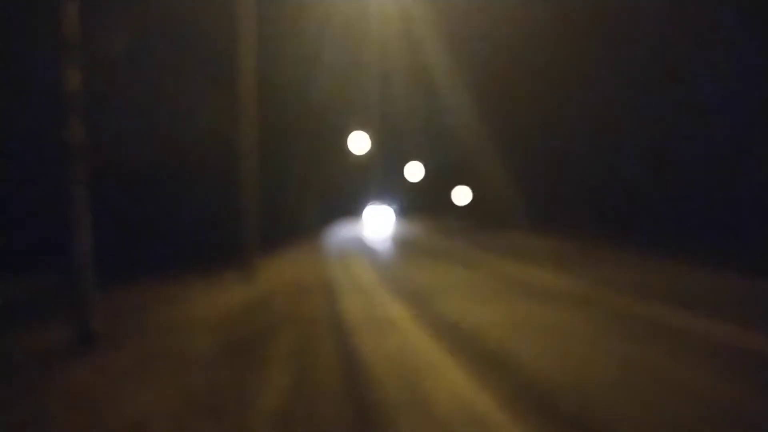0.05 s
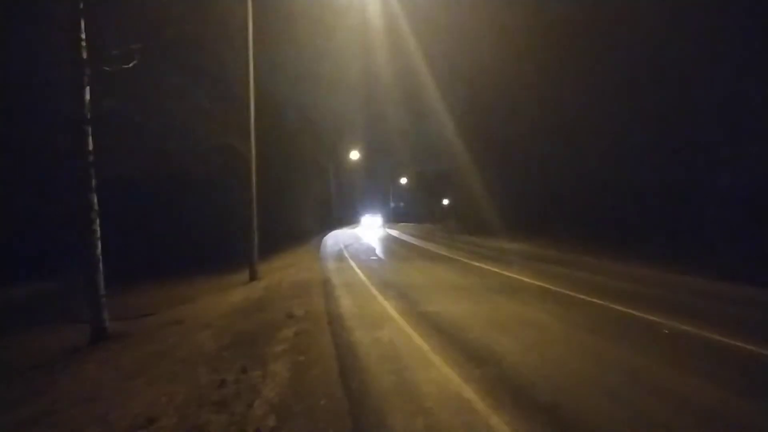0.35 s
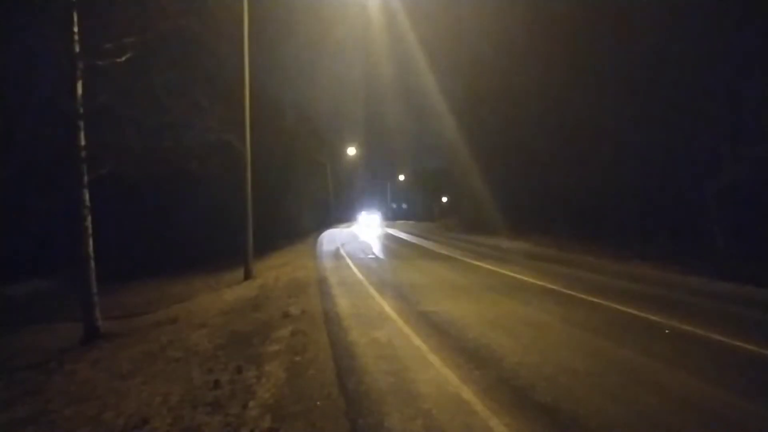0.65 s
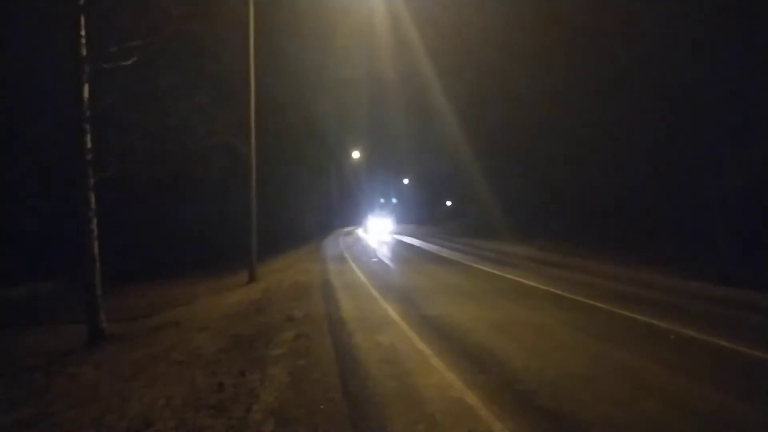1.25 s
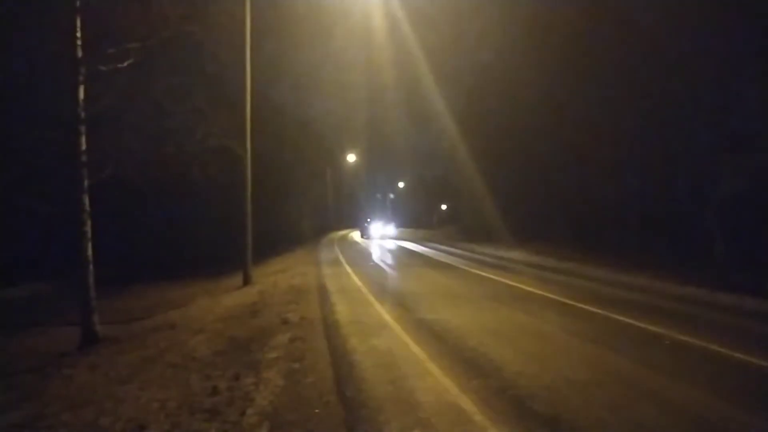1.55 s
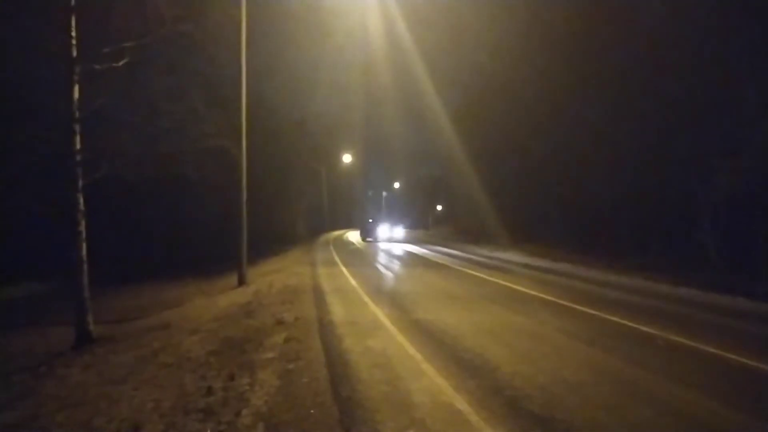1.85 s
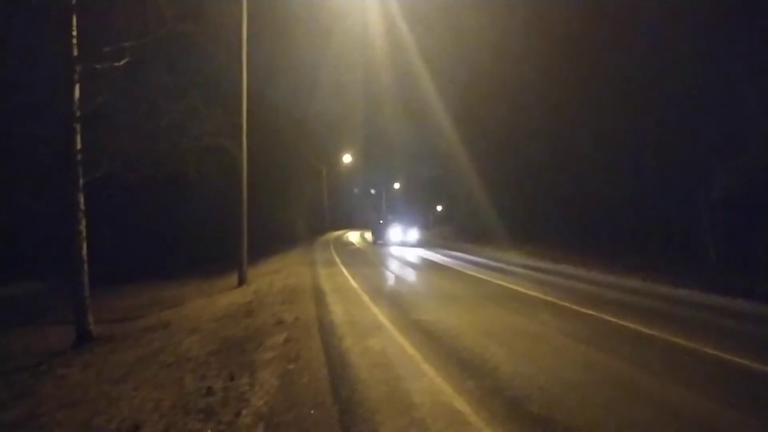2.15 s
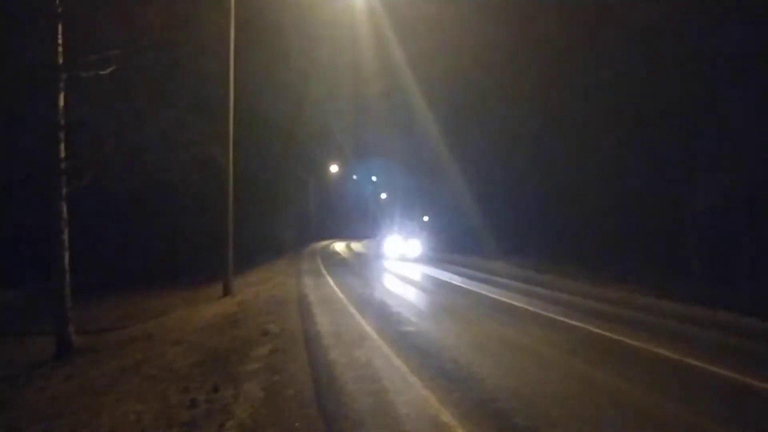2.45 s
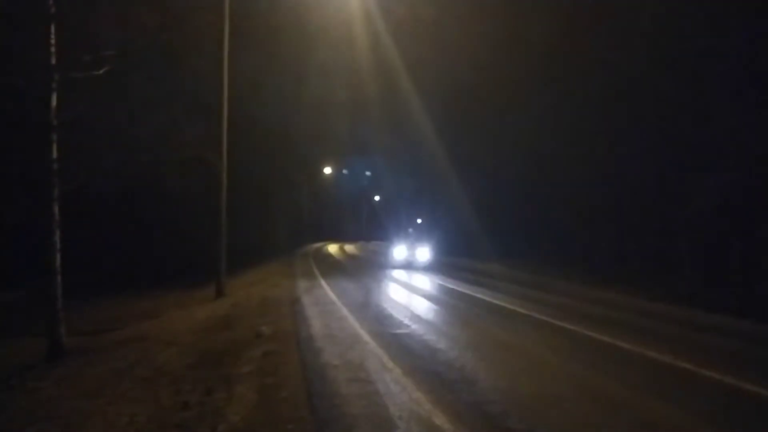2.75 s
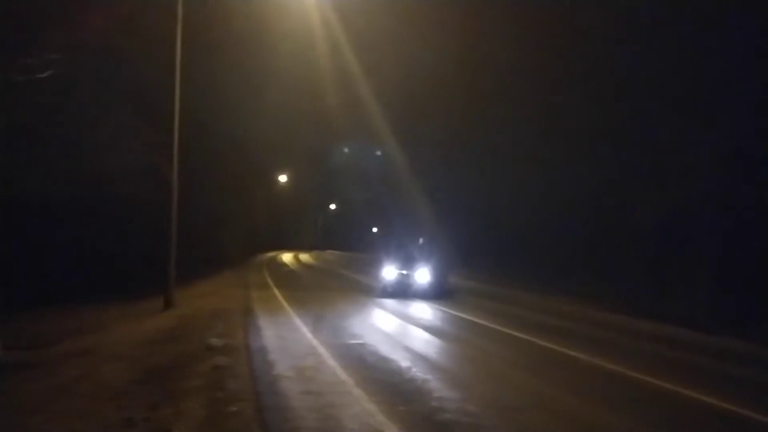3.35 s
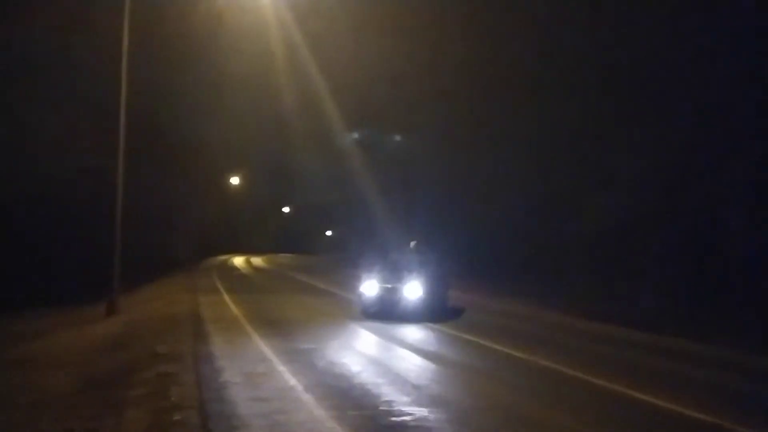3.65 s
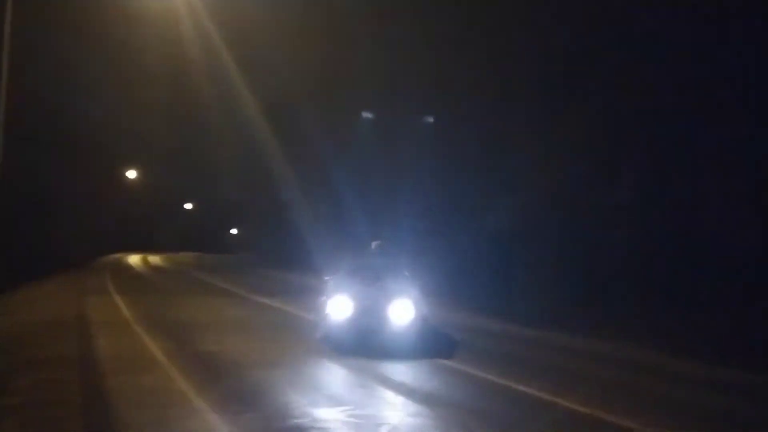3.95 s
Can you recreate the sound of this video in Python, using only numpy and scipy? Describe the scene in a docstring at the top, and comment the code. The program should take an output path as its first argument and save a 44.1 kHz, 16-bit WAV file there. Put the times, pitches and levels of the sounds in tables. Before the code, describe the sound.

Heard from the roadside among trees, a vehicle's tyres roar on wet pavement, distant at first and then steadily closer. The engine drones underneath while watery hiss builds, ending with a quick run of slaps and small splashes.

```python
"""The tyres of a heavy vehicle roar near 1 kHz as it approaches on a damp, tree-lined road at night.
The roar brightens and its resonances rise as the vehicle nears; the tread sings, and slaps and
splashes over bumps. Water flung off the tread hisses above it, and the engine's firing drones below.
Two closely spaced roadside microphones receive the direct sound, scatter from the trees and a
treble reflection from a nearby surface."""
import sys
import numpy as np
from scipy import signal
from scipy.fft import rfft, irfft
from scipy.io import wavfile
from scipy.ndimage import uniform_filter1d, map_coordinates

SR = 44100
rng = np.random.default_rng(int(sys.argv[2]) if len(sys.argv) > 2 else 0)


def dump_mix(stems):
    """Bounce the given channels to the path in sys.argv[1] as a 16-bit WAV at rate SR."""
    frames = np.atleast_2d(stems).T  # one column per channel
    limited = np.clip(frames, -1, 1)  # hard clip at full scale
    pcm = np.round(limited * 32767).astype(np.int16)
    wavfile.write(sys.argv[1], SR, pcm)


N = 176400

# Tyre roar arriving at the roadside: time_s, gain_db
ROAR_GAIN = [(0, -38), (.5, -37.5), (.85, -37), (1.11, -33.5), (1.27, -34.5), (1.45, -36.5), (1.62, -37),
             (1.88, -34), (2.3, -33.5), (2.6, -32.5), (2.85, -32), (3.15, -29.5), (3.35, -27.5),
             (3.53, -28), (3.59, -26.5), (3.75, -26.3), (3.86, -26), (4, -27.5)]
# Openness of the path to the tyres: time_s, nearness (0 far and screened, 1 close)
PATH_NEARNESS = [(0, 0.068), (.75, 0.11), (1.05, 0.43), (1.25, 0.74), (1.42, 0.28), (1.65, 0.27),
                 (2.0, 0.46), (2.5, 0.84), (3.0, 0.95), (3.3, 0.87), (3.6, 1), (4, 0.78)]
# Tyre spectrum far away: frequency_hz, gain_db
FAR_SPECTRUM = [(150, -30), (380, -18.5), (500, -2.5), (590, -8.5), (700, -2), (800, -6), (930, 1.5),
                (1030, -0.5), (1170, 3), (1450, -11.5), (1700, -2), (1930, -12.5), (2100, -7.5),
                (2450, -18.5), (2950, -20), (3350, -22.5), (3600, -26), (4400, -34.5), (6000, -40.5),
                (9000, -47), (11000, -82)]
# Tyre spectrum close by: frequency_hz, gain_db
NEAR_SPECTRUM = [(150, -25), (380, -14), (480, -11.5), (570, -10.5), (740, -8), (930, 0), (1080, -2.5),
                 (1280, -1.5), (1500, -4), (1770, -0.5), (1980, -8), (2210, -6), (2500, -17), (2760, -5.5),
                 (2980, -10.5), (3200, -20.5), (3420, -15.5), (3700, -30), (3950, -23), (5000, -36),
                 (6500, -34.5), (9000, -33.5), (11000, -78)]
# Shift of the tyre resonances: time_s, frequency_ratio
RESONANCE_SHIFT = [(0, 0.991), (2.6, 0.985), (3.1, 1.004), (3.501, 1.014), (3.75, 1.033), (4, 1.048)]
# Narrow band sung by the tread: time_s, level_db, centre_hz
TREAD_BAND = [(.95, -50, 1179), (1.22, -39.5, 1292), (1.5, -50.5, 1142), (1.9, -41.5, 1070),
              (2.3, -45, 1081), (2.8, -53, 1120), (3.3, -35.5, 1162), (3.6, -26.5, 1240), (3.82, -29, 1342),
              (4, -30.5, 1380)]
# Hollow tyre rumble, strongest at middle distance: time_s, level_db
RUMBLE_LEVEL = [(0, -63), (1.1, -61.5), (2.1, -49), (3.1, -54)]
# Its spectrum: frequency_hz, gain_db
RUMBLE_SPECTRUM = [(200, -25), (330, 5.5), (385, -8), (470, 0), (570, 8.5), (680, -1), (790, 11.5),
                   (1200, -28)]

# Tyres striking bumps: start_s, impact_db, splash_db
BUMPS = [(1.424, -21, -70), (3.419, -14, -52), (3.5822, -7.5, -28), (3.612, -10.5, -46), (3.622, -12, -48),
         (3.724, -15, -35), (3.821, -11, -44), (3.843, -11, -31)]
# Modes of the struck tread: frequency_hz, gain_db, t60_s
TREAD_MODES = [(1000, -3, .004), (1400, -2, .003)]
# Spectrum of a splash: frequency_hz, gain_db
SPLASH_SPECTRUM = [(1500, -19), (3000, -13), (5000, -5), (7000, -11), (8900, 7), (9800, -5), (12000, -48)]
# Spray off the tread: time_s, gain_db
SPRAY_GAIN = [(0, -72), (.7, -71), (1.05, -63), (1.27, -66), (1.42, -68), (1.65, -64), (2.12, -56.5),
              (2.45, -59), (2.8, -57.5), (3.0, -52.5), (3.45, -48.5), (3.66, -44), (3.74, -44),
              (3.88, -43.5), (4, -40.5)]
# Its spectrum: frequency_hz, gain_db
SPRAY_SPECTRUM = [(4000, -14.5), (6000, -7.5), (7200, -2.5), (8000, 4.5), (9000, 5.5), (9600, -12.5),
                  (10400, -40), (11500, -44), (14000, -39)]
# Wet rasp of the tread: time_s, level_db
RASP_LEVEL = [(0, -71), (.8, -65.5), (1.07, -56.5), (1.17, -58.5), (1.25, -53), (1.36, -59), (1.6, -64),
              (2.0, -59), (2.9, -54.5), (3.4, -52.5), (3.75, -46.5), (4, -49)]
# Its spectrum: frequency_hz, gain_db
RASP_SPECTRUM = [(1500, -20), (2500, -4), (2850, 5.5), (3250, -11), (3480, 2), (3750, 2), (4020, 2),
                 (4400, -0.5), (4750, -1), (5500, -6.5), (8000, -5), (10500, -50)]
# Hiss of the finest mist: time_s, level_db
MIST_LEVEL = [(2.2, -92), (2.899, -63), (3.3, -59), (3.6, -51.5), (4, -45.5)]
# Its spectrum: frequency_hz, gain_db
MIST_SPECTRUM = [(6000, -32), (8500, 6), (9600, 6.5), (10600, -9.5), (12000, -18), (14000, -15)]

# Engine drone: time_s, level_db
DRONE_LEVEL = [(0, -51), (1.0, -50.5), (2.1, -47.5), (2.9, -43.5), (3.45, -41), (4, -36)]
# Its spectrum: frequency_hz, gain_db
DRONE_SPECTRUM = [(40, -31), (75, -9), (110, -7.5), (140, -8), (170, -4.5), (212, -3.5), (240, 1), (290, 0),
                  (330, 0.5), (385, -7), (460, -1), (560, -4.5), (680, -1), (1200, -67)]
# Deep engine boom: time_s, level_db
BOOM_LEVEL = [(0, -67), (.7, -71), (1.35, -68), (1.45, -59.5), (1.698, -62.5), (2.548, -58.5), (2.9, -54),
              (3.251, -56), (3.7, -50.5), (4, -49)]
# Its spectrum: frequency_hz, gain_db
BOOM_SPECTRUM = [(12, -30), (25, -12), (43, -1.5), (52, -7), (62, -5.5), (78, -16), (140, -23), (300, -73)]
# Wavering hum within the drone: time_s, pitch_hz, level_db
ENGINE_HUM = [(.55, 178, -74), (.75, 172.5, -56), (1.25, 160, -53), (1.45, 170.1, -73), (1.8, 180, -61),
              (2.7, 184.5, -59), (3.4, 180.2, -58), (3.7, 173.6, -46), (4, 168, -47)]
# The engine's lowest note: time_s, pitch_hz, level_db
LOW_NOTE = [(1.3, 45, -80), (1.5, 44.9, -70), (2.5, 45, -66), (2.85, 45.06, -61.5), (4, 44.3, -50)]

# Lag of the reflection from a nearby surface: time_s, delay_ms
REFLECTION_DELAY = [(2.7, 2.045), (3.2, 2.02), (3.6, 1.96), (4, 1.88)]
# Direction of the vehicle: time_s, left_over_right_db, right_delay_ms
DIRECTION = [(0, 0.6, 0), (2.4, 0.5, 0.007), (3.2, 0.3, 0.041), (3.7, 0, 0.026), (4, 0.5, 0.014)]
# Level difference between the microphones: frequency_hz, left_over_right_db
PAIR_BALANCE = [(100, 4), (300, 4), (550, 2.5), (1000, 2), (1350, 0.5), (1520, -5.5), (1780, 1.5),
                (2000, -0.5), (2350, 2), (2620, 9), (3100, 4), (3800, -0.5), (5200, -1.5), (6600, 5.5),
                (9000, -2), (13000, -0.5)]
# Likeness of their signals: frequency_hz, coherence (0 to 1)
PAIR_COHERENCE = [(100, .993), (600, .975), (1000, .93), (1300, .9), (1500, .66), (1780, .8), (2000, .55),
                  (2250, .72), (2520, .45), (2850, .86), (3600, .62), (6500, .35), (8000, .6), (9200, .88)]
# Their phase difference: frequency_hz, left_lead_rad
PAIR_PHASE = [(100, 0.25), (600, -0.25), (1100, -0.62), (1400, -1.14), (1620, -0.51), (1900, -1.44),
              (2150, 1), (2600, -0.87), (4500, -1.43), (7000, -1.62)]


def tyre_roar(trim_db=1.38, flicker_db=.5):
    """Source and filter: tread noise passes through resonances that brighten and rise on approach."""
    hz, frame_s, noise = signal.stft(at_microphones(rng.standard_normal(N)), SR, nperseg=1024)
    near = np.interp(frame_s, *np.transpose(PATH_NEARNESS))
    unshifted_hz = hz[:, None] / np.interp(frame_s, *np.transpose(RESONANCE_SHIFT))
    colour_db = (1 - near) * at_hz(FAR_SPECTRUM, unshifted_hz) + near * at_hz(NEAR_SPECTRUM, unshifted_hz)
    flicker = uniform_filter1d(rng.standard_normal(noise.shape), size=6, axis=0)  # across frequency
    flicker = rms_one(uniform_filter1d(flicker, size=5, axis=1))  # across time
    _, roar = signal.istft(noise * from_db(colour_db + flicker_db * flicker), SR)
    return rms_one(roar[:, :N]) * from_db(in_time(ROAR_GAIN)[0] + trim_db)


def tread_song():
    """Random modulation: tread blocks drum at an unsteady rate, spreading their tone into a band."""
    level_db, centre_hz = in_time(TREAD_BAND)
    song = band_pass(narrow_band(centre_hz, spread_hz=180), low_hz=800, high_hz=1700)
    return at_microphones(rms_one(song)) * from_db(level_db)


def slaps():
    """Impulse response: each bump rings the damped modes of the tread."""
    start_s, impact_db, _ = np.transpose(BUMPS)
    impacts = np.zeros(N)
    impacts[(start_s * SR).astype(int)] = from_db(impact_db)
    ringing = np.zeros(N)
    for hz, gain_db, t60_s in TREAD_MODES:
        radius, angle = from_db(-60 / (t60_s * SR)), 2 * np.pi * hz / SR
        feedback = [1, -2 * radius * np.cos(angle), radius ** 2]
        ringing += from_db(gain_db) * signal.lfilter([0, np.sin(angle)], feedback, impacts + 1e-18)
    return band_pass(ringing, low_hz=610, high_hz=1950)  # the slap keeps no deep thud and little treble


def splashes(trim_db=-3.5, rise_s=.0031, decay_s=.0068):
    """Exponential growth and decay: each bump throws a puff of spray that peaks at the impact."""
    t = np.arange(N) / SR
    envelope = np.zeros(N)
    for peak_s, _, splash_db in BUMPS:
        time_constants = np.maximum((peak_s - t) / rise_s, (t - peak_s) / decay_s)
        envelope += from_db(splash_db + trim_db) * np.exp(-np.minimum(time_constants, 20))
    return envelope * coloured(at_microphones(rng.standard_normal(N)), SPLASH_SPECTRUM)


def spray(trim_db=-1, drops_per_s=7900, spread_db=13, drops_db=-7.5):
    """Shot noise: drops of random size leave the tread at random moments, within a smooth hiss."""
    sizes = from_db(spread_db * np.minimum(rng.exponential(1, N), 5)) * rng.choice([-1, 1], N)
    drops = from_db(drops_db) * rms_one(sizes * (rng.random(N) < drops_per_s / SR))
    hiss = coloured(at_microphones(rng.standard_normal(N) + drops), SPRAY_SPECTRUM)
    flicker_db = .25 * drift(39)
    return hiss * from_db(in_time(SPRAY_GAIN)[0] + trim_db + flicker_db)


def mist(flicker_db=2.5):
    """Amplitude modulation: the hiss of the finest mist flickers, and carries only a short way."""
    return shaped_noise(MIST_SPECTRUM, MIST_LEVEL) * from_db(flicker_db * drift(25))


def engine(firing_hz=60.05, wander=.02, jitter_db=11.5, firing_db=-8):
    """Quasi-periodic excitation: uneven firing pulses sound with a hum, a low note, drone and boom."""
    cycles = np.cumsum(firing_hz * (1 + wander * drift(1.5))) / SR
    pulses = np.diff(np.floor(cycles), prepend=0) * from_db(jitter_db * rng.uniform(-.44, 1, N))
    firing = coloured(at_microphones(pulses), DRONE_SPECTRUM)
    firing *= from_db(in_time(DRONE_LEVEL)[0] + firing_db)
    hum_hz, hum_db = in_time(ENGINE_HUM)
    hum = at_microphones(narrow_band(hum_hz, spread_hz=18)) * from_db(hum_db)
    note_hz, note_db = in_time(LOW_NOTE)
    note_phase = 2 * np.pi * np.cumsum(note_hz) / SR
    note = at_microphones(rms_one(np.sin(note_phase))) * from_db(note_db)
    drone = shaped_noise(DRONE_SPECTRUM, DRONE_LEVEL)
    boom = shaped_noise(BOOM_SPECTRUM, BOOM_LEVEL)
    return firing + hum + note + drone + boom


def with_reflection(pair, strength=.42, above_hz=4000):
    """Comb filtering: an inverted reflection ripples the treble; the ripple rises as the lag shortens."""
    delay_ms, = in_time(REFLECTION_DELAY)
    treble = signal.sosfiltfilt(signal.butter(4, above_hz, "high", fs=SR, output="sos"), pair)
    return pair - strength * np.array([delayed(side, delay_ms) for side in treble])


def at_microphones(x):
    """Partial coherence: direct sound and tree scatter reach a pair differing in level and phase."""
    hz, sides = np.fft.rfftfreq(N, 1 / SR), np.array([[1], [-1]])
    coherence = at_hz(PAIR_COHERENCE, hz)
    direct = rfft(x)
    scatter = direct * np.exp(2j * np.pi * rng.random(len(hz)))
    pair = np.sqrt((1 + coherence) / 2) * direct + sides * np.sqrt((1 - coherence) / 2) * scatter
    balance = from_db(sides * at_hz(PAIR_BALANCE, hz) / 2)
    balance /= np.sqrt(np.mean(balance ** 2, axis=0))  # constant total power
    phase_shift = np.exp(.5j * sides * at_hz(PAIR_PHASE, hz))
    return irfft(pair * balance * phase_shift, N)


def shaped_noise(spectrum, level):
    """Filtered stereo noise of constant spectrum, following a level curve."""
    return coloured(at_microphones(rng.standard_normal(N)), spectrum) * from_db(in_time(level)[0])


def narrow_band(centre_hz, spread_hz):
    """Quadrature modulation: two random amplitudes spread a tone about its moving centre."""
    phase = 2 * np.pi * np.cumsum(centre_hz) / SR
    return drift(spread_hz) * np.cos(phase) + drift(spread_hz) * np.sin(phase)


def drift(corner_hz):
    """Slow random fluctuation: noise through a two-pole low-pass, with rms near 1."""
    hop, settling = 40, 2000  # samples per step, steps
    pole = np.exp(-2 * np.pi * corner_hz * hop / SR)
    noise = rng.standard_normal(N // hop + settling + 2)
    slow = signal.lfilter([1], [1, -2 * pole, pole ** 2], noise)[settling:]
    return np.interp(np.arange(N) / hop, np.arange(len(slow)), rms_one(slow))


def coloured(x, spectrum):
    """Filtering by spectral multiplication, scaled to rms 1."""
    gain = from_db(at_hz(spectrum, np.fft.rfftfreq(N, 1 / SR)))
    return rms_one(irfft(rfft(x) * gain, N))


def band_pass(x, low_hz, high_hz):
    """Attenuation outside a band."""
    return signal.sosfilt(signal.butter(2, [low_hz, high_hz], "band", fs=SR, output="sos"), x)


def delayed(x, delay_ms):
    """Time-varying delay by cubic interpolation."""
    return map_coordinates(x, [np.arange(N) - delay_ms * SR / 1000], order=3, mode="nearest")


def in_time(rows):
    """Linear interpolation of each column at every sample."""
    time_s, *columns = np.transpose(rows)
    return [np.interp(np.arange(N) / SR, time_s, column) for column in columns]


def at_hz(rows, hz):
    """Interpolation on a log-frequency axis."""
    frequency_hz, values = np.transpose(rows)
    return np.interp(np.log(hz + 1e-9), np.log(frequency_hz), values)


def from_db(db):
    """Decibels to amplitude ratio."""
    return 10 ** (np.asarray(db) / 20)


def rms_one(x):
    """Normalisation to rms 1."""
    return x / np.sqrt(np.mean(x ** 2) + 1e-20)


def scene():
    """Superposition: the sources add, and level and time differences give the vehicle its direction."""
    water = mist() + shaped_noise(RASP_SPECTRUM, RASP_LEVEL) + spray()
    rolling = tyre_roar() + tread_song() + shaped_noise(RUMBLE_SPECTRUM, RUMBLE_LEVEL)
    left, right = with_reflection(rolling + water + engine() + slaps() + splashes())
    balance_db, lag_ms = in_time(DIRECTION)
    return np.array([left * from_db(balance_db / 2), delayed(right, lag_ms) * from_db(-balance_db / 2)])


def record(dry):
    """Band limiting: a steep low-pass removes the highest treble."""
    stopband_hz, rejection_db = 14900, 70
    return signal.sosfilt(signal.cheby2(16, rejection_db, stopband_hz, fs=SR, output="sos"), dry)


dry = scene()
out = record(dry)
dump_mix(out)
```